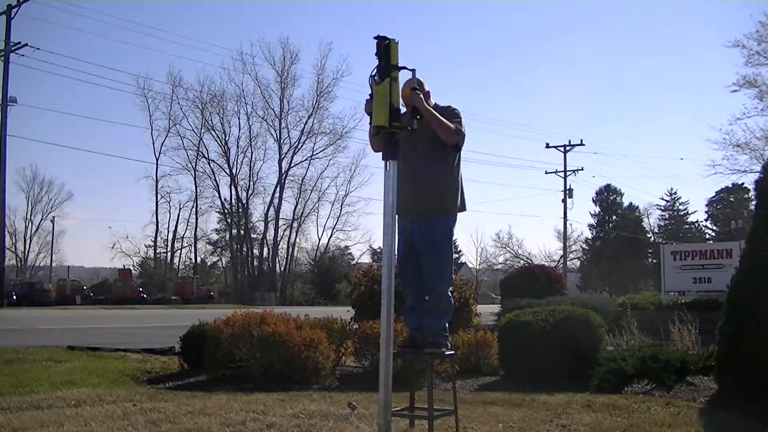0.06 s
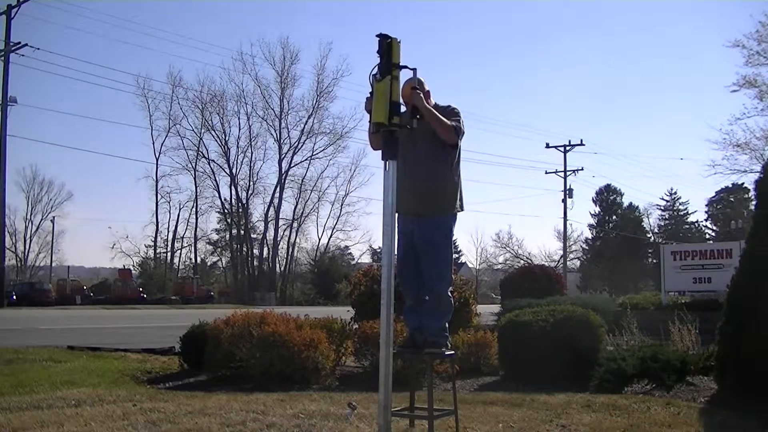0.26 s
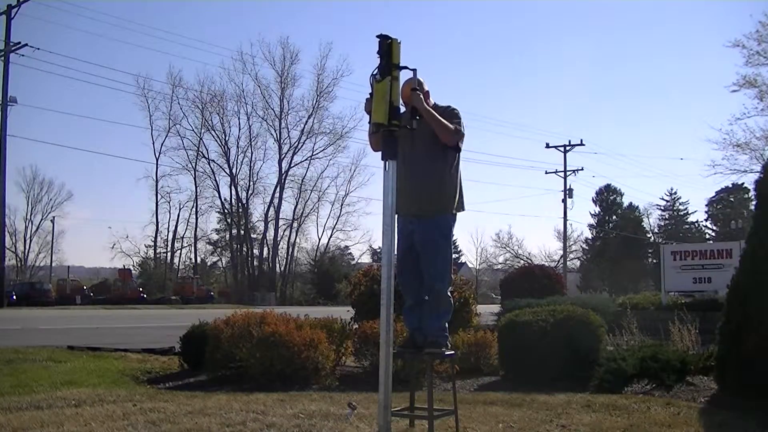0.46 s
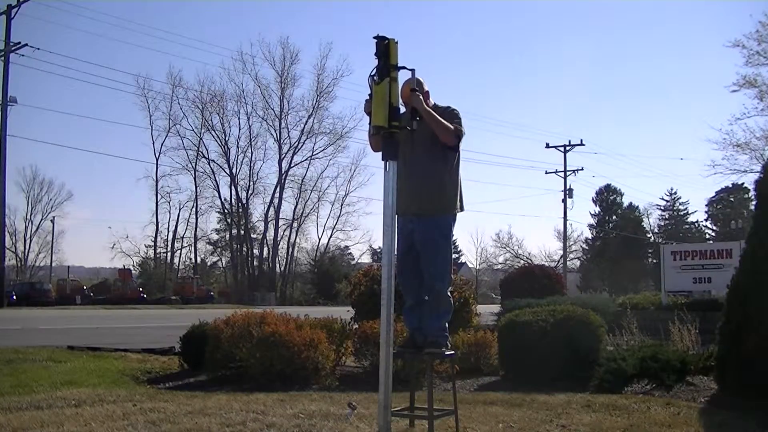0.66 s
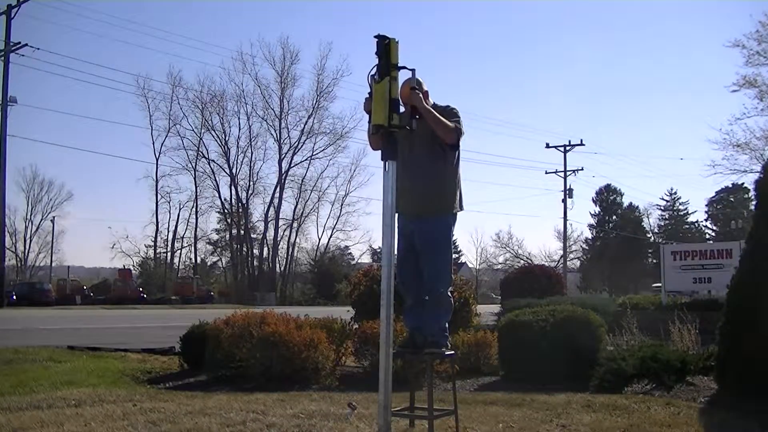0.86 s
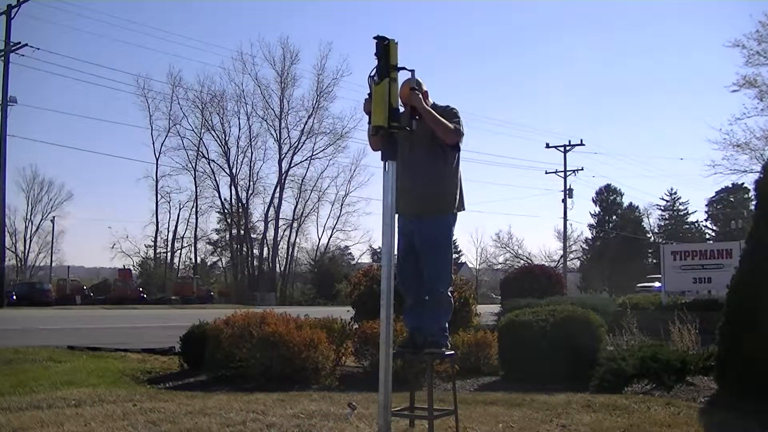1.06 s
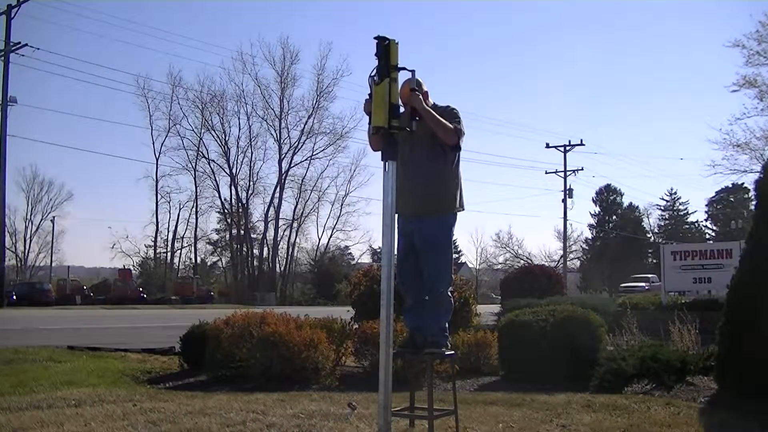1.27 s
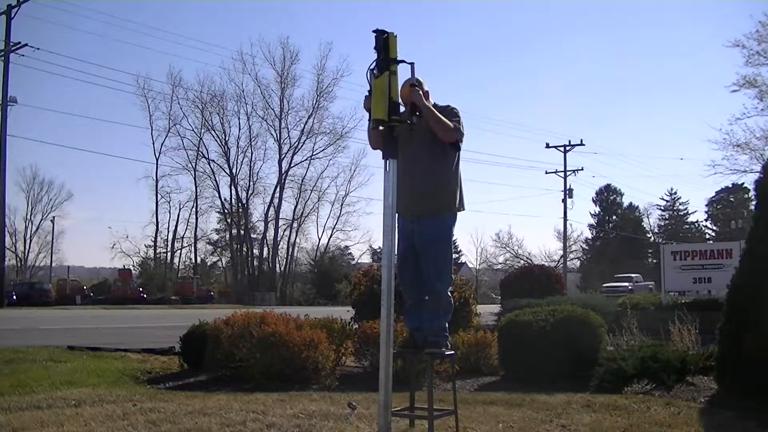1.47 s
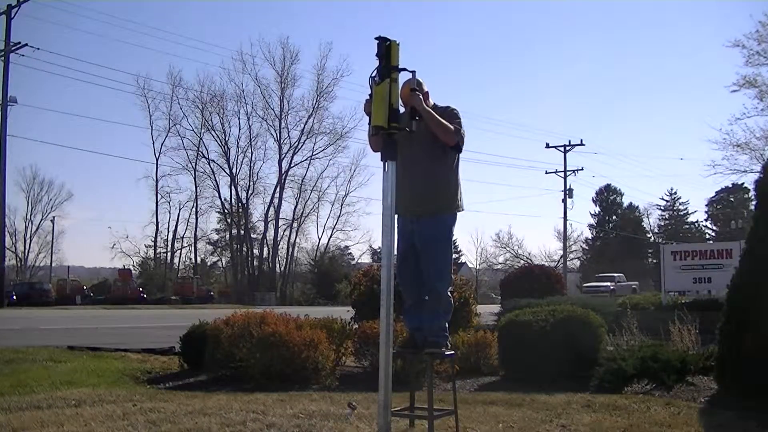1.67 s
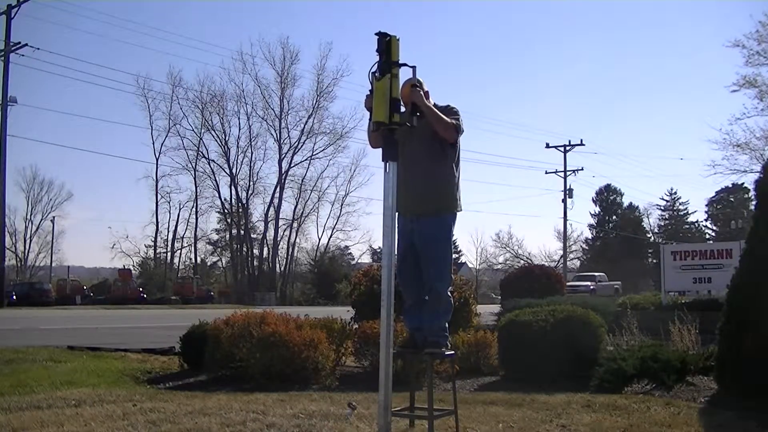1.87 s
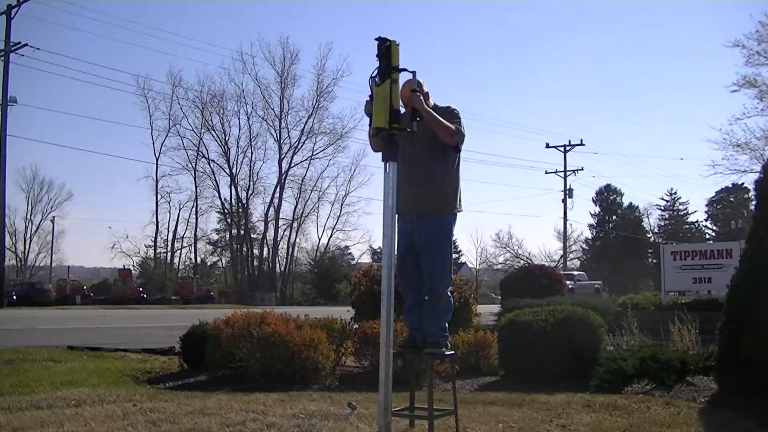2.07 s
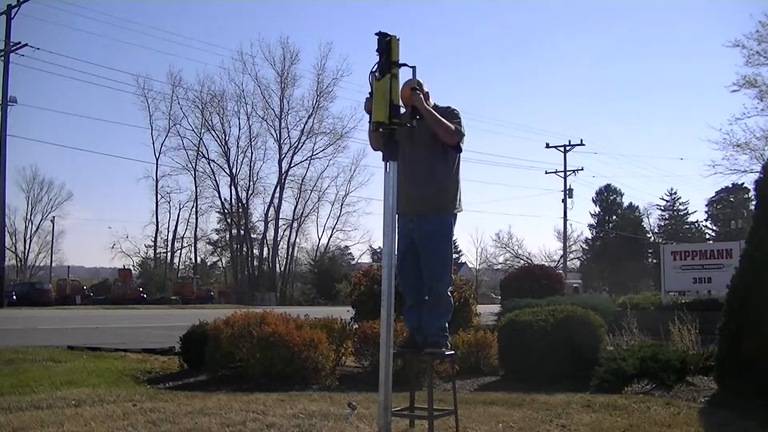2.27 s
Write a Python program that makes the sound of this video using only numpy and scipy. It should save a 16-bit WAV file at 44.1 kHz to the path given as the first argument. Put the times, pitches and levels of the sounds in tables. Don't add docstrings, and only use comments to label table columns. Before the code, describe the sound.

A gas-powered post driver hammers a steel post outdoors, some metres from a camera microphone. The previous stroke's ring, hiss and clacks open it; then pops with metallic blows land near 0.2, 0.5, 0.8, 1.2, 1.5 and 1.8 seconds. Each is followed by a hard clack about 0.08 seconds later, rattle, ringing and exhaust hiss. Faint jingles, short yard echoes, low road hum; final clacks and intake hiss near 2.2.

```python
import sys
import numpy as np
from scipy import signal
from scipy.fft import rfft, irfft, next_fast_len
from scipy.io import wavfile
from scipy.ndimage import uniform_filter1d

SR = 44100
rng = np.random.default_rng(int(sys.argv[2]) if len(sys.argv) > 2 else 0)


def dump_mix(stems):
    frames = np.atleast_2d(stems).T
    limited = np.clip(frames, -1, 1)
    pcm = np.round(limited * 32767).astype(np.int16)
    wavfile.write(sys.argv[1], SR, pcm)


def boost_factor(decibels):
    exponent = np.asarray(decibels, float) / 20
    return 10 ** exponent


N = 101430

POP_S = [.2165, .5358, .8042, 1.1794, 1.495, 1.8153]
BLOW_DELAY_S = 0.007


def unit(x):
    return x / np.sqrt(np.mean(x ** 2) + 1e-20)


def along(points, hz):
    f, v = np.transpose(points)
    return np.interp(np.log(hz + 1), np.log(f + 1), v)


def filtered(x, response):
    m = next_fast_len(x.shape[-1] + SR // 2)
    return irfft(rfft(x, m) * response(np.fft.rfftfreq(m, 1 / SR)), m)[..., :x.shape[-1]]


def resonance(f, hz, width_hz):
    return 1j * f * width_hz / (hz * hz - f * f + 1j * f * width_hz)


def band(hz, width_hz):
    return unit(filtered(rng.standard_normal(N), lambda f: resonance(f, hz, width_hz)))


def causal(points):
    cepstrum = irfft(np.log(boost_factor(along(points, np.fft.rfftfreq(4096, 1 / SR))) + 1e-6))
    cepstrum[1:2048] *= 2
    cepstrum[2049:] = 0
    h = irfft(np.exp(rfft(cepstrum)))[:2048]
    return h / np.linalg.norm(h)


def noise(points, patchy_db):
    z = signal.stft(rng.standard_normal(N), nperseg=256)[2]
    field = uniform_filter1d(rng.standard_normal(z.shape), size=4, axis=0)
    field = uniform_filter1d(field, size=10, axis=1)
    x = signal.istft(z * boost_factor(patchy_db * unit(field)), nperseg=256)[1][:N]
    return unit(filtered(x, lambda hz: boost_factor(along(points, hz))))


def dying(s, t60, rise=0.00014):
    t = np.maximum(np.arange(N) / SR - s, 0)
    return boost_factor(-60 * t / t60) * (1 - np.exp(-t / rise))


def strokes():
    # [t/s, peak level/dB, port f/Hz, tube ring level/dB]
    pop_rows = [
        (0.214, -5, 710, -6),
        (0.534, -4.5, 780, 0),
        (0.803, -5, 735, 1.5),
        (1.178, -7, 675, -2),
        (1.493, -5, 740, -5),
        (1.814, -4.5, 805, 1),
    ]
    earlier = (-.128, -5, 798, -2.5)
    return [earlier] + [(s, *row[1:]) for s, row in zip(POP_S, pop_rows)]


def road():
    # [f/Hz, level/dB]
    road_colour = [(15, -49), (25, -41.5), (157, -2.5), (641, -14.5), (988, -3), (1100, -10.5), (3620, -15),
                   (3920, -30), (16000, -51)]
    level_db, left_db, alike = -45.5, -13, 0.38
    a, b = noise(road_colour, patchy_db=2), noise(road_colour, patchy_db=2)
    u = np.arccos(np.clip(alike, 0, 1)) / 2
    pair = [np.cos(u) * a + np.sin(u) * b, np.cos(u) * a - np.sin(u) * b]
    return boost_factor(level_db + left_db * np.array([[.5], [-.5]])) * pair


def gas():
    # [opens t/s, shuts t/s, hiss level/dB]
    exhaust = [
        (-.1, 0.109, -33),
        (0.212, 0.439, -31),
        (0.531, 0.772, -31),
        (0.799, 1.048, -34.5),
        (1.172, 1.408, -34),
        (1.504, 1.739, -32.5),
        (1.806, 2.067, -31),
    ]
    # [f/Hz, level/dB]
    hiss_colour = [(350, 8), (600, -8), (1040, -8.5), (2210, -5), (3530, -7.5), (6460, -11), (7410, -21.5),
                   (9240, -1), (16000, -18)]
    shut_t60_s, leak_db, leak_t60_s = .07, -17, .45
    intake_db, intake_db_per_s = -29.5, 747
    next_pop_s, low_hz = 2.305, 400
    t = np.arange(N) / SR
    flow = np.zeros(N)
    for opens, shuts, db in exhaust:
        late = np.maximum(t - shuts, 0)
        closing = boost_factor(-60 * late / shut_t60_s) + boost_factor(leak_db - 60 * late / leak_t60_s)
        flow += boost_factor(db) * (t > opens) * np.where(t < shuts, 1, closing)
    for s in list(POP_S) + [next_pop_s]:
        flow += boost_factor(intake_db - intake_db_per_s * abs(s - t)) * (t < s)
    return flow * filtered(noise(hiss_colour, patchy_db=1.8), lambda f: 1 / (1 + (low_hz / (f + 1)) ** 4))


def pops():
    # [f/Hz, width/Hz, level/dB]
    chamber = [(172.4, 114, 4), (459, 104, 6), (1770, 730, -10.5)]
    far_walls = [(-17, 710), (-21, 2100), (-29.5, 990)]
    echo_s = [.147, .075, .226]
    spit_colour = [(2000, -6), (8000, -11.5), (10500, 2.5), (16000, -23)]  # Hz, dB
    pop_db, port_width_hz, port_db, push_top_hz = 32, 126, 0.5, 2170
    spit_db, spit_t60_s = -3, 0.014
    echo_low_hz, smear_s = 130, 0.0038
    lead = SR // 4
    out = np.zeros(N + lead)
    for s, db, port_hz, _ in strokes():
        push = np.zeros(SR // 2)
        push[0] = -boost_factor(db + pop_db)
        smear = rng.uniform(0, 1, (len(far_walls), 3, 2))

        def body(f):
            modes = list(chamber) + [(port_hz, port_width_hz, port_db)]
            ring = sum(boost_factor(d) * resonance(f, hz, width) for hz, width, d in modes)
            return ring / (1 + 1j * f / push_top_hz) ** 2

        def walls(f):
            echoes = 0
            for late, (d, top_hz), parts in zip(echo_s, far_walls, smear):
                spread = sum((1 + g) / 2 * np.exp(-2j * np.pi * f * (late + smear_s * (u - .5))) for u, g in parts)
                echoes = echoes + boost_factor(d) * spread / (1 + 1j * f / top_hz) ** 2
            return 1 + (1j * f / (1j * f + echo_low_hz)) ** 2 * echoes

        at = round(s * SR) + lead
        out[at:at + len(push)] += filtered(push, lambda f: body(f) * walls(f))[:len(out) - at]
    spit = sum(boost_factor(db + spit_db) * dying(s + .0006, spit_t60_s) for s, db, *_ in strokes())
    return out[lead:] + spit * noise(spit_colour, patchy_db=4)


def steel():
    # [f/Hz, level/dB]
    post = [(1662, -30), (4326, -39), (5889, -45), (6243, -39), (6558, -34), (7696, -46), (9157, -34),
            (9649, -32), (9806, -30), (10610, -30), (11312, -42), (11600, -46), (12015, -41), (12064, -39)]
    # [f/Hz, level/dB]
    ram = [(2005, -39), (2970, -45), (3510, -43), (4953, -42), (5300, -52), (5640, -43)]
    # [f/Hz, level/dB]
    rattle_colour = [(290, -72), (500, -32.5), (974, -3), (1090, -17.5), (1640, -6), (3920, -14.5),
                     (4210, -14.5), (9630, -8), (16000, -21)]
    modes_db, modes_t60_s, spread_db, detune = -10, .21, 3, .0008
    rattle_db, rattle_t60_s, drive_t60_s = -11, 0.28, 0.098
    return_s, return_db = .07, -5
    bell_hz, bell_t60_s, bell_db, swell_s = 971, 1.7, -25.5, .03
    beat_hz, partner_gain, partner_t60_s = 10.7, 2.4, .6
    out, t = np.zeros(N), np.arange(N) / SR
    chatter = noise(rattle_colour, patchy_db=2.5)
    metal = list(post) + list(ram)
    loudest_db = max(row[1] for row in post)
    width_hz = np.log(1000) / np.pi / modes_t60_s
    for s, db, _, bell_gain_db in strokes():
        s = s + BLOW_DELAY_S
        luck = rng.standard_normal(len(metal) + 1)
        drive = rng.standard_normal(N) * dying(s, drive_t60_s) / np.sqrt(drive_t60_s * SR)

        def modes(f):
            total = 0
            for (hz, d), g in zip(metal, luck):
                gain = boost_factor(d - loudest_db + spread_db * g) * SR / np.pi / width_hz
                total = total + gain * resonance(f, hz * (1 + detune * np.sin(7 * g)), width_hz)
            return total

        now = slice(max(round(s * SR), 0), round(s * SR) + SR // 2)
        ring = np.zeros(N)
        ring[now] = filtered(drive[now], modes)
        held = boost_factor(return_db * np.clip((t - s - return_s) / .01, 0, 1))
        turn = 2 * np.pi * (t - s)
        partner = np.sin(turn * (bell_hz + beat_hz) + luck[-1]) * dying(s, partner_t60_s, swell_s)
        bell = np.sin(turn * bell_hz) * dying(s, bell_t60_s, swell_s) + held * partner_gain * partner
        struck = boost_factor(modes_db) * ring + boost_factor(rattle_db) * chatter * dying(s, rattle_t60_s)
        out += boost_factor(db) * (held * struck + boost_factor(bell_db + bell_gain_db) * bell)
    return out


def clang():
    hz, width_hz, level_db, t60_s = 9760, 530, -14.5, 0.26
    blows = sum(boost_factor(db + level_db) * dying(s + BLOW_DELAY_S, t60_s, 0.0015) for s, db, *_ in strokes())
    return blows * band(hz, width_hz)


def clacks():
    # [t/s, peak level/dB, brightness/dB]
    clack_rows = [(0.0287, -18, -3), (0.0719, -16.5, -2), (0.193, -27.5, -20), (0.2904, -5, -3.5),
                  (0.4015, -27, 5), (0.4394, -25, 4), (0.6091, -2, -6), (0.7353, -14.5, 0.5),
                  (0.8814, -5.5, -1.5), (0.9901, -15, 0.5), (1.0267, -22.5, 2), (1.1494, -41, -14),
                  (1.258, -4, -4.5), (1.3832, -18, -1.5), (1.4731, -26.5, -21), (1.57, -6.5, -2),
                  (1.7, -16, 0), (1.8884, -6, -0.5), (1.9879, -15, -1), (2.0284, -13.5, -11),
                  (2.174, -26.5, -33), (2.2493, -19.5, -30.5), (2.2761, -21, -2)]
    # [f/Hz, level/dB]
    clack_colour = [(120, -48), (200, -10.5), (1940, -0.5), (2470, -3.5), (4430, -8), (7410, -17),
                    (9400, -15.5), (11100, -10.5), (16000, -62)]
    level_db, tick_db, tail_db, tail_t60_s = -5, 9.5, -3, .036
    bright_db, split_hz = 7.5, 5500
    grit, tick = noise(clack_colour, patchy_db=3), causal(clack_colour)

    def struck(gains_db):
        ticks, tails = np.zeros(N), np.zeros(N)
        ticks[[round(row[0] * SR) + 30 for row in clack_rows]] = -boost_factor(np.add(gains_db, tick_db))
        for row, db in zip(clack_rows, gains_db):
            tails += boost_factor(db + tail_db) * dying(row[0], tail_t60_s, .0012)
        return signal.fftconvolve(ticks, tick)[:N] + tails * grit

    def high(f):
        return 1 / (1 + (split_hz / (f + 1)) ** 4)

    dull = struck([db for _, db, _ in clack_rows])
    bright = struck([db + more for _, db, more in clack_rows])
    return boost_factor(level_db) * (filtered(dull, lambda f: 1 - high(f)) + boost_factor(bright_db) * filtered(bright, high))


def loose_part():
    # [t/s, level/dB, length/s]
    jingle_rows = [
        (0.465, -45, 0.031),
        (0.683, -27.5, 0.023),
        (0.744, -33, 0.035),
        (0.936, -34.5, 0.032),
        (1.028, -36, 0.043),
        (1.692, -34.5, 0.026),
        (2.132, -44.5, 0.028),
    ]
    hz, width_hz = 9880, 110
    t = np.arange(N) / SR
    shiver = sum(boost_factor(db) * np.exp(-((t - s - long / 2) / (long / 2)) ** 2) for s, db, long in jingle_rows)
    return shiver * band(hz, width_hz)


def yard(x):
    # [f/Hz, t60/s]
    yard_decay = [(150, 0.15), (1000, 0.95), (8000, 0.27)]
    hz, t, z = signal.stft(rng.standard_normal((2, SR // 2)), SR, nperseg=256)
    tail = signal.istft(z * boost_factor(-60 * t / along(yard_decay, hz)[:, None]), SR, nperseg=256)[1]
    late = np.pad(x, (300, 0))[None]
    return signal.fftconvolve(late, tail / np.linalg.norm(tail[0]), axes=1)[:, :N]


def lawn_dip(f):
    hz, wide_hz, narrow_hz = 306, 88, 45.7
    return (hz ** 2 - f * f + 1j * f * narrow_hz) / (hz ** 2 - f * f + 1j * f * wide_hz)


def near_wall(f):
    delay_s, left_db, right_db, top_hz = .0026, -35.5, -6.5, 5270
    return 1 + boost_factor([[left_db], [right_db]]) * np.exp(-2j * np.pi * f * delay_s) / (1 + 1j * f / top_hz)


def lean(f):
    left_db = along([(3000, -4.5), (9000, -1.7)], f)
    return boost_factor(np.outer([.5, -.5], left_db))


def scene():
    yard_db = -16.5
    traffic = road()
    driver = filtered(gas() + pops() + steel() + clang() + clacks() + loose_part(), lawn_dip)
    return filtered(filtered(driver, near_wall) + boost_factor(yard_db) * yard(driver), lean) + traffic


def roll_off(x):
    return signal.sosfilt(signal.butter(12, 16510, fs=SR, output="sos"), x)


def record(dry):
    low_hz, ceiling, top_hz = 120, 1.05, 15600
    x = filtered(dry, lambda f: (1j * f / (1j * f + low_hz)) ** 2)
    x = x / (1 + abs(x / ceiling) ** 8) ** (1 / 8)
    x = filtered(x, lambda f: np.where(f < top_hz, 1, boost_factor(-25)))
    return roll_off(x)


dry = scene()
out = record(dry)
dump_mix(out)
```